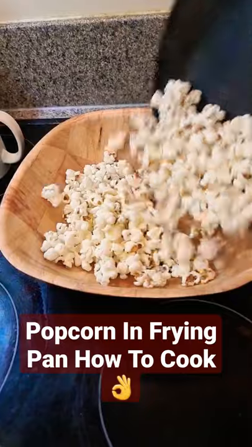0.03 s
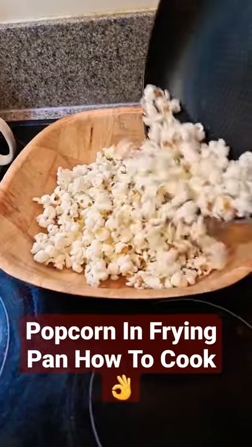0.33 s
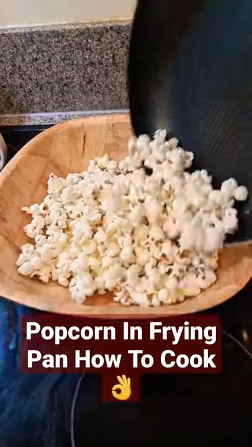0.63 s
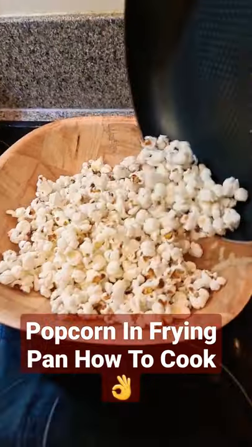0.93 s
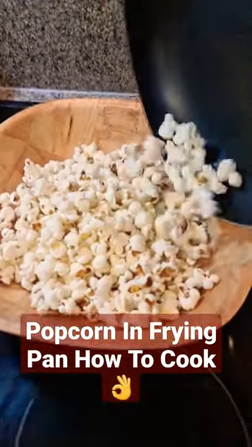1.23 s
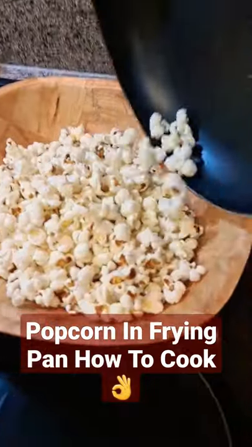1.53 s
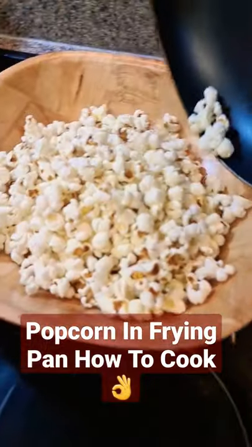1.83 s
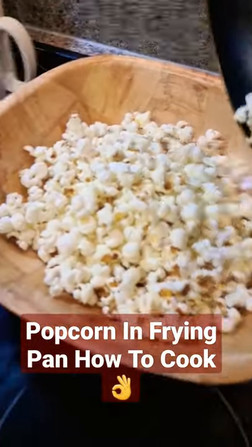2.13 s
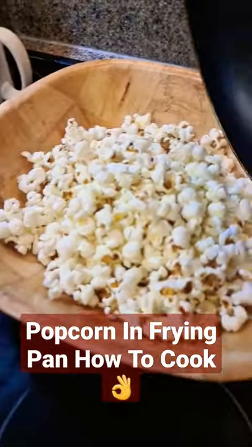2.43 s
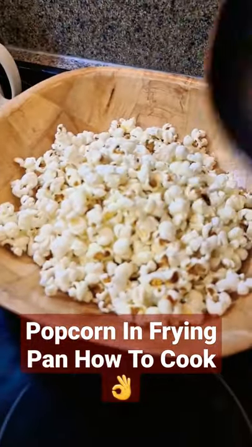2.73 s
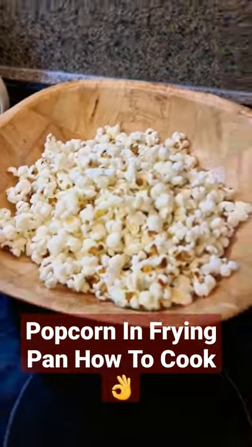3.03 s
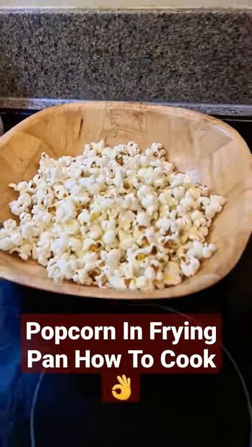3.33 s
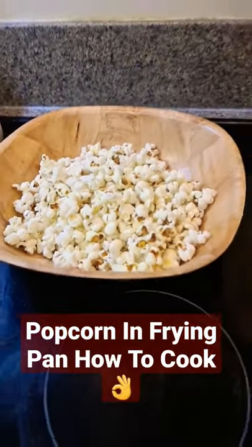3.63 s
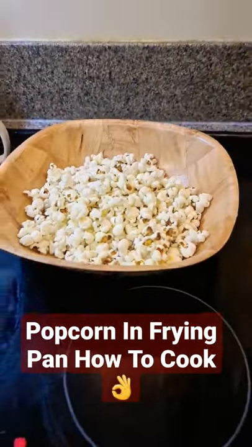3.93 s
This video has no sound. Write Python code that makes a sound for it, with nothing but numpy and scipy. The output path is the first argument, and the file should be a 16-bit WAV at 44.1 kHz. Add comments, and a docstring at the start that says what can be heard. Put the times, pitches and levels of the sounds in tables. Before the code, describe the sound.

Popcorn pours from a frying pan into a wooden bowl, close by, with crisp taps, soft pats and rustling. It is densest in the first half second and thins to stragglers by about 2 seconds. Oil sizzles faintly, slightly left, and fades. The pan handle clicks twice near 2.7 seconds, and the pan is set down with a dull bump around 3.8. A low kitchen rumble lies underneath.

```python
"""Popcorn into a wooden bowl

A small kitchen, stereo microphone close by. Popcorn is tipped from a hot frying pan: hard pieces tap,
soft ones pat and rustle onto the heap, pan and bowl ring along, and the stream thins to stragglers.
Oil sizzles faintly, a little to the left. The handle clicks near the microphone as the pan is lifted
away, and the pan is set down with a dull bump. A low room rumble lies under it all."""
import sys
import numpy as np
from scipy import signal
from scipy.fft import rfft, irfft
from scipy.io import wavfile

SR = 44100
rng = np.random.default_rng(int(sys.argv[2]) if len(sys.argv) > 2 else 0)


def digitize_waveform(pressure):
    """Quantize a signal to 16-bit integers and store it at the path in sys.argv[1].

    Rows of a 2-D input are taken as channels; values are limited to [-1, 1].
    """
    field = np.atleast_2d(pressure).T
    bounded = np.clip(field, -1, 1)
    quanta = np.round(bounded * 32767).astype(np.int16)
    wavfile.write(sys.argv[1], SR, quanta)


N = 176400
HIT_SIZE = 16384   # samples in one hit, room tail included


def taps():
    """Each hard piece knocks the wood, rings briefly at its own pitch, clacks and snaps."""
    # t/s, ring f/Hz, nominal ring width/Hz, relative level/dB of ring, knock, clack, snap; left-right/dB
    landings = [(0.0035,2007,150,-24,-32.5,-40,-57,4), (0.026,2470,700,-37,-41,-45,-38,1),
                (0.03,2100,700,-43,-40,-34.5,-54,-6), (0.0776,2950,700,-42,-43,-29,-31.5,3.5),
                (0.098,4720,1100,-32.5,-36.5,-33,-54,-1), (0.134,6530,900,-49,-64,-34,-37,5),
                (0.1406,6500,900,-52,-46,-43,-28,3), (0.1507,2210,500,-28,-42,-33,-44,3),
                (0.157,2720,600,-40,-49,-32,-43,-2), (0.1916,1965,200,-27.5,-44,-27,-41,2),
                (0.203,2500,260,-33,-42,-44,-46,-10), (0.259,4650,1000,-31,-39,-32.5,-36.5,-2),
                (0.273,2210,600,-35.5,-31,-39,-54,-2), (0.409,2300,400,-33,-50,-45,-58,2.5),
                (0.422,2540,600,-37,-44,-45,-61,-1), (0.462,2580,500,-44,-43,-56,-55,0),
                (0.495,5100,900,-48,-51,-48,-42,-1), (0.526,1950,45,-38.5,-39.5,-50.5,-69,-2),
                (0.6614,4260,1100,-34,-40.5,-40.5,-40,-1), (0.672,4640,800,-35,-43,-36,-38.5,-1.5),
                (0.844,2840,350,-34.5,-49,-52,-55,-1), (0.922,2750,800,-30,-42,-26.5,-23.5,-1),
                (1.1567,3020,260,-26,-35,-27.5,-44.5,-3), (1.308,3060,400,-28.5,-44,-34.5,-43,2.5),
                (1.329,5600,1200,-37.5,-50.5,-36,-35,0), (1.438,2400,450,-27.5,-38.5,-35,-44,-0.5),
                (1.576,2580,610,-43,-43.5,-48,-54,0.5), (1.626,2600,500,-50,-47.5,-54,-69,-2),
                (1.6468,2405,380,-29.5,-44,-36,-45.5,-2), (1.818,3780,450,-49,-51.5,-48.5,-67,-1),
                (2.121,1250,600,-45,-36.5,-51,-51,3), (2.228,2570,700,-48,-50,-53,-56,3)]
    # spectra of the woody knock, the clack and the crisp snap: f/Hz, level/dB
    knock = [(120, -23), (260, -7.5), (450, -11.5), (700, -3), (1100, -5), (1600, -9), (2500, -22.5),
             (6000, -41)]
    clack = [(1000, -23), (1700, -0.5), (2200, 14), (3000, 14), (4300, 9.5), (5500, -1.5), (9000, -26.5)]
    snap = [(2000, 2.2), (4000, 22), (5800, 26.1), (7800, 23.2), (10500, 15), (15500, 4)]
    out = np.zeros((2, N))
    for s, hz, width_hz, ring_db, knock_db, clack_db, snap_db, side_db in landings:
        close_click = path(direct_db=-3, room_db=-6.5)
        ring = resonance(resonance(close_click, hz, 0.75 * width_hz), hz, hz / 2)
        hit = (at_level(ring, ring_db - 2)
               + at_level(coloured(path(), knock), knock_db - 2.5)
               + at_level(coloured(path(), clack), clack_db - 1.5)
               + at_level(coloured(rasp(), snap), snap_db - 0.5))
        add(out, s, lean(side_db) * hit)
    return out


def rasp(t60_s=0.0065, burst_db=-5.5):
    """A hard, rough contact rasps for an instant, then the room answers."""
    burst = noise_burst(t60_s)
    return from_db(burst_db) * burst / np.sqrt(HIT_SIZE) + path()


def plops():
    """Soft pieces land on the wood with a dull pat."""
    # landings: t/s, relative level/dB
    landings = [(0.046, -37.5), (0.114, -45), (0.233, -34), (0.25, -33), (0.387, -42), (0.48, -32.5),
                (0.796, -48), (0.863, -33.5), (1.045, -39.5), (1.097, -50), (1.281, -42), (1.764, -41.5),
                (2.009, -50), (2.063, -38), (2.076, -48), (2.776, -49.5), (3.352, -55.5)]
    # spectrum of a pat: f/Hz, level/dB
    pat = [(150, -4.5), (350, -6.5), (660, 7), (850, 0), (1300, -2), (2000, -10), (4000, -9.5),
           (15000, -24)]
    out = np.zeros((2, N))
    for s, db in landings:
        add(out, s, at_level(coloured(path(), pat), db - 7))
    return out


def rustle():
    """Many light contacts in the sliding stream, fading as the pour ends."""
    # strength of the pour: t/s, level/dB
    pour = [(0, -35), (.13, -44.5), (.27, -36.5), (.34, -49.5), (.42, -40.5), (.56, -53), (.61, -44),
            (.7, -56.5), (.88, -46.5), (1.05, -47), (1.25, -51), (1.68, -56), (1.92, -62), (2.08, -57),
            (2.35, -63), (3.12, -64), (3.3, -69.5), (4, -71.5)]
    # spectrum of the light contacts: f/Hz, level/dB
    spectrum = [(100, -8.5), (250, -11), (420, -14.5), (750, 0.5), (1300, -1.5), (1600, -2.5), (2100, 0.5),
                (3000, 0.5), (5000, -14), (9000, -8.5), (15000, -9)]
    grains = crackle(per_s=650, spread_db=4.5)
    return from_db(in_time(pour)) * rms_one(coloured(grains, spectrum))


def pan_ring(contacts):
    """The metal pan rings along with the taps and the stream."""
    # pan modes: f/Hz, relative level/dB, t60/s
    modes = [(1313, 4, .09), (1911, -1, .11), (1978, 1, .11), (2152, -4, .1), (2400, -5, .08),
             (2676, -6, .08), (2861, -5, .08), (3042, -5, .07), (3700, -5, .06), (4692, 0, .05)]
    return from_db(-1.5) * body(contacts, modes)


def bowl_boom(stream):
    """The wooden bowl booms softly under the stream."""
    # bowl modes: f/Hz, level/dB, t60/s
    modes = [(147.6, 25, 0.22), (252, 17.5, 0.083), (275, 9, 0.45)]
    return body(stream, modes)


def handle_clicks():
    """The handle ticks and rings close to the microphone as the pan is lifted."""
    # two clicks with a faint one between: t/s, level/dB
    clicks = [(2.638, -42), (2.668, -62), (2.7, -49)]
    # handle modes: f/Hz, level/dB, t60/s
    modes = [(827, -1.5, 0.086), (1350, 3, 0.13), (1830, -6.5, 0.042), (2280, -4, 0.043),
             (3516, -2.5, 0.076), (5000, -13, 0.04), (7540, -13, 0.023), (9000, -14, 0.03)]
    # spectrum of the tick: f/Hz, level/dB
    tick = [(300, -33), (700, 7), (3000, 0.5), (8000, 7.5), (15000, -4.5)]
    out = np.zeros((2, N))
    for s, db in clicks:
        ring = body(path(direct_db=-0.5), modes)
        add(out, s, at_level(ring, db) + at_level(coloured(rasp(), tick), db))
    return out


def pan_bump(cutoff_hz=700):
    """The pan is set down: a cushioned contact with no treble and a dull ring."""
    # contacts: t/s, level/dB
    bumps = [(3.848, -40.5), (3.87, -47.5)]
    # modes of the dull ring: f/Hz, level/dB, t60/s
    modes = [(138, 5.5, 0.19), (213, 8, 0.077), (335, 3, 0.1), (405, 5.5, 0.11), (454, -23, 0.31),
             (700, -24, 0.1), (880, -36, 0.14)]
    cushion = signal.butter(2, cutoff_hz, fs=SR, output="sos")
    out = np.zeros((2, N))
    for s, db in bumps:
        thud = signal.sosfilt(cushion, path())
        add(out, s, at_level(body(thud, modes), db))
    return out


def sizzle():
    """Hot oil hisses left of centre, fading as the pan empties and moves off."""
    # strength of the frying: t/s, relative level/dB
    frying = [(0.0, -64), (0.09, -50), (0.26, -51.5), (0.65, -55), (1.1, -52), (1.73, -56.5), (2.24, -55),
              (3.21, -62.5), (4.0, -66.5)]
    # spectrum of the hiss: f/Hz, level/dB
    spectrum = [(500, 5.5), (1500, -9), (3000, -3), (5000, 1.5), (8000, 1), (12000, -0.5), (15500, -2.5)]
    hiss = rms_one(coloured(crackle(per_s=7000, spread_db=10), spectrum))
    return lean(3.5) * from_db(in_time(frying) - 1.5) * hiss


def rumble(level_db=-41.5):
    """Room tone of the kitchen: a low, slowly swelling rumble."""
    # spectrum of the room tone: f/Hz, level/dB
    spectrum = [(18, -26), (25, -23), (31, -8.5), (46, 0.5), (55, -3), (66, 1.5), (77, 6), (86, -1.5),
                (98, -4.5), (110, -9), (133, -16), (155, -29.5), (245, -23.5), (300, -29), (400, -25.5),
                (540, -35), (700, -32), (950, -37), (1400, -43.5), (3100, -47), (5000, -43.5),
                (15000, -45.5)]
    # swell: t/s, relative level/dB
    swell = [(0, -1), (1.2, -1.5), (1.6, 1), (2.5, -1), (3.1, -3.5), (4, -1.5)]
    room_tone = coloured(diffuse(N + HIT_SIZE), spectrum)[:, HIT_SIZE:]
    return from_db(level_db + in_time(swell)) * rms_one(room_tone)


def path(direct_db=-10, room_db=-7, left_lead_s=0.00017):
    """A click as it reaches the microphone: direct sound, close reflections, kitchen tail."""
    early = noise_burst(t60_s=0.067)   # off bowl and worktop
    late = noise_burst(t60_s=0.27)
    out = (early + from_db(room_db) * late) / np.sqrt(HIT_SIZE)
    out[0, 0] += from_db(direct_db)
    out[1, int(left_lead_s * SR)] += from_db(direct_db)
    return out


def diffuse(size):
    """Stereo white noise, alike in the bass and unrelated in the treble."""
    # room sound at the microphone: f/Hz, left-right correlation
    likeness = [(30, 0.97), (80, 1), (160, 0.88), (350, 0.71), (700, 0.26), (1500, 0), (15000, 0)]
    mid, side = rfft(rng.standard_normal((2, size)))
    alike = np.clip(per_bin(likeness, size), -1, 1)
    return rms_one(irfft(np.sqrt(1 + alike) * mid + np.sqrt(1 - alike) * side * [[1], [-1]], size))


def noise_burst(t60_s):
    """Diffuse noise dying away; rms 1."""
    t = np.arange(HIT_SIZE) / SR
    return rms_one(diffuse(HIT_SIZE) * from_db(-60 * t / t60_s))


def crackle(per_s, spread_db, spots=9):
    """Random clicks of uneven size from a few spots; rms 1."""
    out = 0
    for _ in range(spots):
        sizes = from_db(spread_db * np.minimum(rng.exponential(1, N), 4)) * rng.choice([-1, 1], N)
        clicks = sizes * (rng.random(N) < per_s / spots / SR)
        out = out + signal.fftconvolve(clicks[None], path())[:, :N]
    return rms_one(out)


def resonance(x, hz, width_hz):
    """Two-pole band-pass, gain 1 at its peak."""
    r = np.exp(-np.pi * width_hz / SR)
    feedback = [1, -2 * r * np.cos(2 * np.pi * hz / SR), r * r]
    return (1 - r * r) / 2 * signal.lfilter([1, 0, -1], feedback, x + 1e-18)


def body(x, modes):
    """A set of modes rung by x."""
    return sum(from_db(db) * resonance(x, hz, np.log(1000) / np.pi / t60) for hz, db, t60 in modes)


def coloured(x, spectrum):
    """Causal (minimum-phase) filter with the given spectrum."""
    size = x.shape[-1]
    cepstrum = irfft(np.log(from_db(per_bin(spectrum, 2 * size))))
    cepstrum[1:size] *= 2
    cepstrum[size + 1:] = 0
    return irfft(rfft(x, 2 * size) * np.exp(rfft(cepstrum)))[..., :size]


def per_bin(points, size):
    """A table over log frequency, read at the bins of an FFT."""
    hz, value = np.transpose(points)
    return np.interp(np.log(np.arange(size // 2 + 1) * SR / size + 1), np.log(hz), value)


def in_time(rows):
    """A curve at every sample."""
    return np.interp(np.arange(N) / SR, *np.transpose(rows))


def from_db(db):
    """Decibels to gain."""
    return 10 ** (np.asarray(db) / 20)


def rms_one(x):
    """Scale to an rms of one."""
    return x / np.sqrt(np.mean(x ** 2) + 1e-20)


def at_level(hit, db, spread_s=0.012):
    """Scale a hit so that its energy, spread over spread_s, has this level."""
    return from_db(db) * rms_one(hit) * np.sqrt(spread_s * SR / HIT_SIZE)


def lean(db):
    """Channel gains for a left-right difference; positive is left."""
    return from_db(db * np.array([[.5], [-.5]]))


def add(out, s, hit):
    """Mix a hit in at time s."""
    start = int(s * SR)
    out[:, start:start + HIT_SIZE] += hit[:, :N - start]


def scene():
    """Popcorn excites pan and bowl; sizzle, pan handling and room tone join in."""
    stream = rustle()
    contacts = from_db(-2) * (taps() + stream)
    ringing = pan_ring(contacts) + bowl_boom(stream)
    return contacts + ringing + plops() + sizzle() + handle_clicks() + pan_bump() + rumble()


def record(dry):
    """The microphone chain cuts the top treble steeply."""
    cutoff_hz = 15600
    return signal.sosfilt(signal.ellip(10, .2, 80, cutoff_hz, fs=SR, output="sos"), dry)


dry = scene()
out = record(dry)
digitize_waveform(out)
```